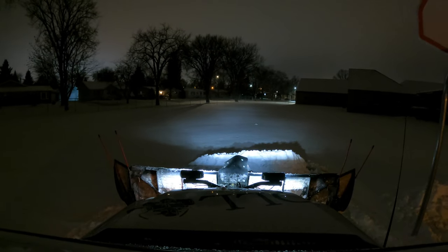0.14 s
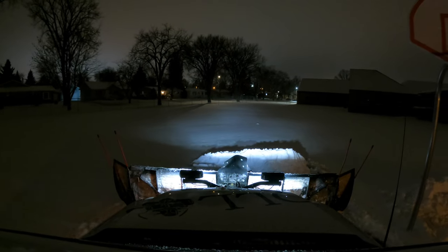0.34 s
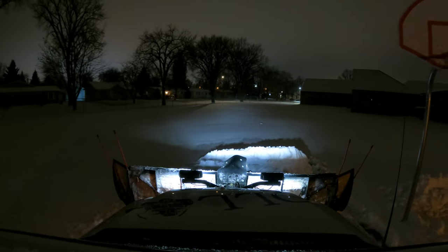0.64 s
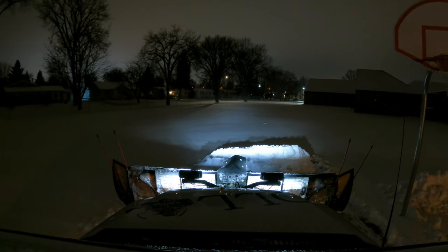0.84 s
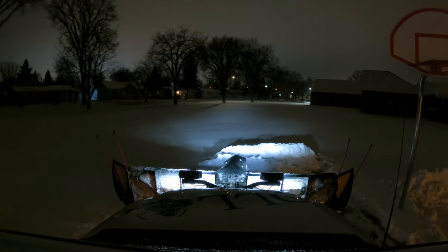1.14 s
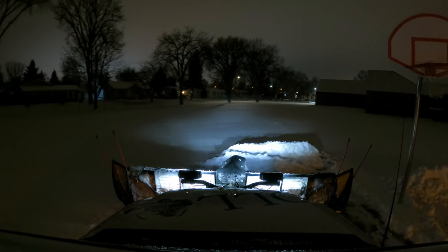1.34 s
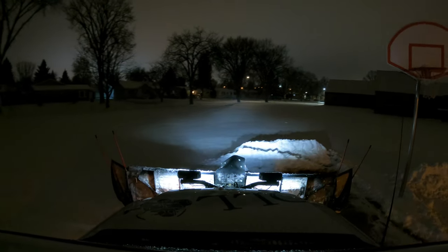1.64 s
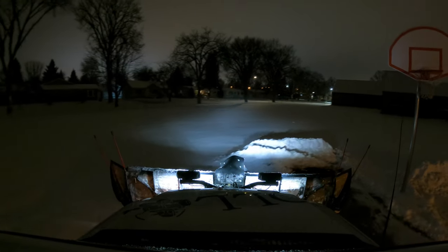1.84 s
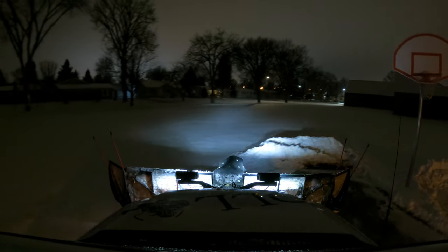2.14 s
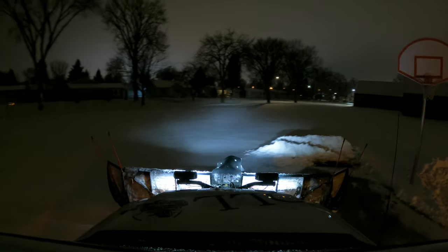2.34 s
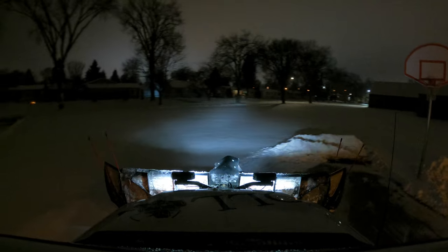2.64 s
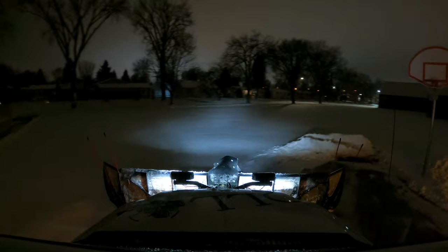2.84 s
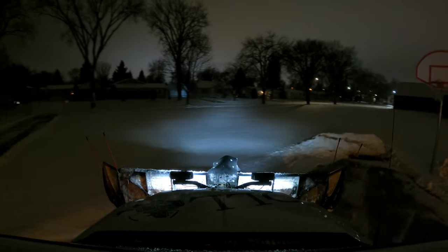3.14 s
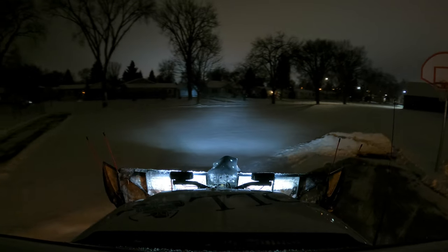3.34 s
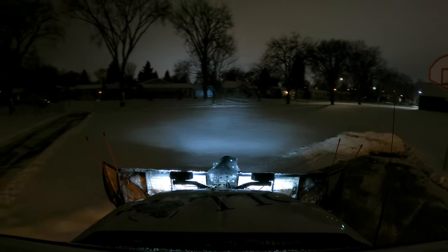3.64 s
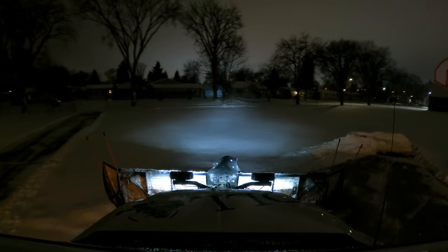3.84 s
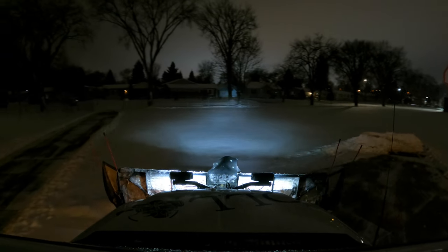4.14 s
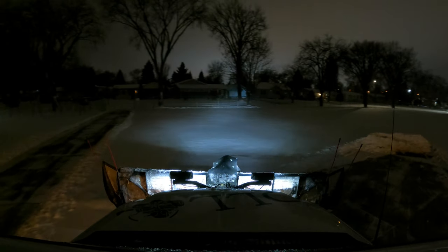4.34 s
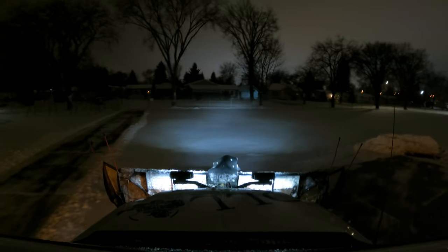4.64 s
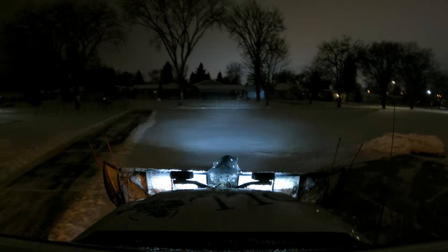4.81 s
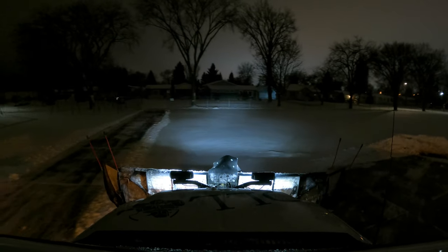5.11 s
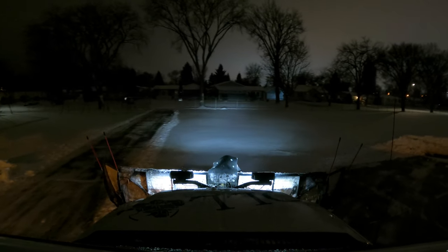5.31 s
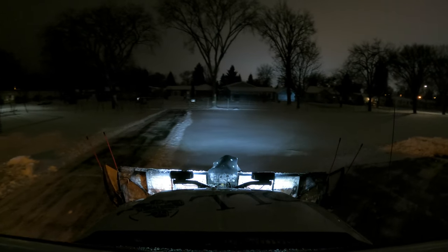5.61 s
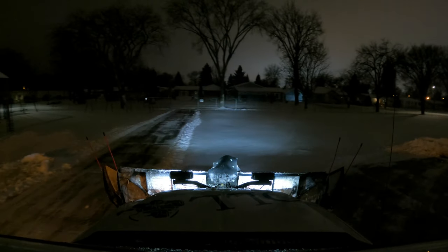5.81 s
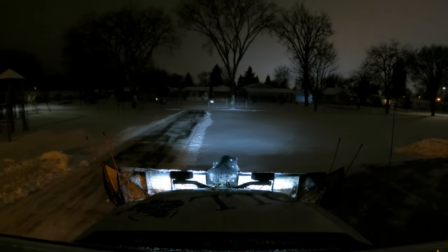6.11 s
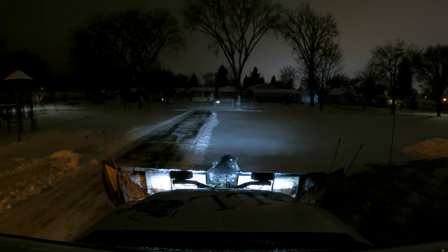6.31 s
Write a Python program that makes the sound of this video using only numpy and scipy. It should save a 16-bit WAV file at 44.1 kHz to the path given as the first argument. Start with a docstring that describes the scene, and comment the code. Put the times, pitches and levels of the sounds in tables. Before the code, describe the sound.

A diesel pickup plows snow on a paved lot, heard close to the hood, with a deep boom and rapid knocking throughout. The blade adds a continuous grainy scraping hiss with a thin, uneven metallic ring. The engine pulls from the start with a faint whine and soft fan noise, reaching its highest revs at about 2 seconds. A high turbo whistle rises with it, peaks just after 2 seconds and fades by 3.5. The engine booms around 2.3 seconds, then drops to lower revs, knocks harder near 3.6, and surges again from about 4.9 to 5.3 before settling. The blade catches on grit with short bright ticks at 4.2 and around 5 seconds. Soft bumps come at 1.8 and 4.6 seconds, and a stronger thud of the plow frame with a low chassis shudder at 6. The engine keeps running to the end, near 6.5 seconds.

```python
"""The boom and knock of a V8 diesel, heard close to the hood of a pickup pushing snow across a paved lot.
The engine pulls, eases off and pulls again. Its exhaust harmonics sweep through the resonances of the
body, and each combustion sets the block ringing with the colour of its cylinder. The turbo whistles up
and down once. Friction makes the plow blade hiss and ring over snow and pavement, and bumps make its
frame thud. Behind these lie a chassis shudder, the cooling fan and a faint whine."""
import sys
import numpy as np
from scipy import signal
from scipy.fft import rfft, irfft, next_fast_len
from scipy.io import wavfile

SR = 44100
rng = np.random.default_rng(int(sys.argv[2]) if len(sys.argv) > 2 else 0)


def inscribe(sig):
    """Save sig as 16-bit PCM at rate SR to the path in sys.argv[1].

    A 1-D sig is mono; a 2-D sig holds one channel per row.
    Samples are clipped to [-1, 1] before scaling.
    """
    pcm = np.round(np.clip(np.atleast_2d(sig).T, -1, 1) * 32767)
    wavfile.write(sys.argv[1], SR, pcm.astype(np.int16))


N = 285327
T = np.arange(N) / SR
FFT_SIZE = next_fast_len(N, real=True)
BIN_HZ = np.maximum(np.arange(FFT_SIZE // 2 + 1) * SR / FFT_SIZE, 1)
SIDES = np.array([[1], [-1]])  # opposite signs for left and right
CYLINDER_COUNT, CRUISE_FIRING_HZ, USUAL_LOAD_DB = 8, 51.2, -33


def from_db(db):
    """Amplitude ratio of a level in decibels."""
    return 10 ** (np.asarray(db) / 20)


def unit_rms(x):
    """Normalisation to unit mean power."""
    return x / np.sqrt(np.mean(x ** 2) + 1e-20)


def in_time(rows):
    """Linear interpolation of each column of a time table at every sample."""
    times, *columns = np.transpose(rows)
    return [np.interp(T, times, column) for column in columns]


def on_bins(rows):
    """Interpolation of a spectrum table on a logarithmic frequency axis."""
    hz, value = np.transpose(rows)
    return np.interp(np.log(BIN_HZ), np.log(hz), value)


def drift(bandwidth_hz):
    """Low-pass random modulation of unit RMS."""
    knots = rng.standard_normal(4000)
    return unit_rms(np.interp(T * bandwidth_hz * 2, np.arange(len(knots)), knots))


# Likeness of left and right: (frequency [Hz], correlation [0-1])
CORRELATION = [(150, .9988), (300, .985), (500, .96), (1000, .94), (2500, .92), (4000, .82), (6500, .84),
               (9000, .8), (11000, .96)]
def noise(spectrum):
    """Partially coherent stereo noise of unit RMS with the given spectral shape."""
    mid, side = rfft(rng.standard_normal((2, FFT_SIZE)))
    alike = np.clip(on_bins(CORRELATION), 0, 1)
    pair = np.sqrt(1 + alike) * mid + np.sqrt(1 - alike) * side * SIDES
    return unit_rms(irfft(pair * from_db(on_bins(spectrum)), FFT_SIZE)[:, :N])


def ring(clicks, hz, t60):
    """Damped oscillator: a unit impulse starts a decaying sine of unit amplitude."""
    radius, step = from_db(-60 / (t60 * SR)), 2 * np.pi * hz / SR
    return signal.lfilter([0, np.sin(step)], [1, -2 * radius * np.cos(step), radius ** 2], clicks + 1e-18)


def firings(crank, lead):
    """Phase crossings: the sample and cylinder of each firing, advanced by `lead` firing intervals."""
    count = np.floor(crank + lead).astype(int)
    at = np.flatnonzero(np.diff(count)) + 1
    return at, count[at] % CYLINDER_COUNT


# Engine speed: (time [s], firing rate [Hz])
FIRING_RATE = [(0.0, 56.46), (0.63, 55.36), (0.84, 59.11), (1.68, 63.69), (1.96, 70.77), (2.23, 67.23),
               (2.56, 52.57), (2.83, 46.78), (3.29, 44.87), (3.81, 51.79), (4.15, 40.77), (4.36, 44.38),
               (4.84, 40.36), (5.24, 59.29), (5.77, 42.33), (6.01, 40.36), (6.47, 47.72)]
# Engine load, expressed as the gain of the knock: (time [s], level [dB])
ENGINE_LOAD = [(0, -39), (1.25, -35.5), (1.85, -32.5), (2.3, -31), (2.6, -37.5), (3.15, -34), (3.58, -29),
               (4.0, -36.5), (4.25, -32), (4.62, -32), (4.84, -30), (4.95, -28), (5.13, -30), (5.4, -36),
               (5.75, -35.5), (5.95, -33), (6.47, -32.5)]
def engine():
    """Phase is the integral of frequency: firing rate, firings so far, and load above the usual."""
    firing_hz = in_time(FIRING_RATE)[0]
    return firing_hz, np.cumsum(firing_hz) / SR, in_time(ENGINE_LOAD)[0] - USUAL_LOAD_DB


# Exhaust harmonics: (multiple of the firing rate [1], relative level [dB])
EXHAUST_HARMONICS = [(1, 2.02), (2, 0.5), (3, -5)]
# Resonance curve of the truck body: (frequency [Hz], level [dB])
BODY_RESPONSE = [(41, -25), (45, -28.5), (50, -19.5), (56, -20), (61, -26.5), (66, -26.5), (72, -44),
                 (84, -32), (92, -30.5), (102, -36.5), (113, -30.5), (122, -21), (131, -37), (145, -34),
                 (158, -30), (170, -29.5), (210, -52)]
# Brief swells and sags: (time [s], half width [s], fundamental gain [dB], overtone gain [dB])
BOOM_SWELLS = [(1.94, 0.068, -9, -12), (2.334, 0.072, 1.5, 11), (2.474, 0.035, 0, 6), (2.723, 0.1, -3, -3),
               (3.27, 0.22, -7.5, 4), (4.077, 0.046, -14, -8), (4.37, 0.13, -5, -17), (5.4, 0.23, -1, -12),
               (5.728, 0.11, -5, -5)]
def exhaust_boom(firing_hz, strain_db, lag_s=0.0504, hardening=0.17, waver_db=0.75, waver_rad=0.018):
    """Forced resonance: each exhaust harmonic booms as it passes through a mode of the body."""
    fundamental_db, overtone_db = 0, hardening * strain_db
    for time_s, half_s, low_db, high_db in BOOM_SWELLS:
        swell = np.exp(-((T - time_s) / half_s) ** 2)
        fundamental_db += low_db * swell
        overtone_db += high_db * swell
    late_hz = np.interp(T - lag_s, T, firing_hz)  # resonances take a moment to build up and let go
    late_crank = np.cumsum(late_hz) / SR
    out = 0
    for multiple, db in EXHAUST_HARMONICS:
        level_db = db + np.interp(multiple * late_hz, *np.transpose(BODY_RESPONSE))
        level_db += fundamental_db if multiple == 1 else overtone_db
        phase = multiple * (2 * np.pi * late_crank + waver_rad * drift(0.8)) + (multiple - 1) * np.pi
        out += np.sqrt(2) * from_db(level_db + waver_db * drift(2.7)) * np.cos(phase)
    return out


# Spectral lines of the uneven exhaust pulses: (multiple of the firing rate [1], relative level [dB])
LOPE_LINES = [(1.375, -1.5), (1.5, -10), (1.625, 1), (2.125, -12.5), (2.25, -2), (2.375, 0.5), (2.5, -3),
              (2.875, -3.5), (3.5, -7.5), (4, 4), (4.25, -4), (5, -6.5)]
# Exhaust rumble as the body colours it: (frequency [Hz], relative level [dB])
RUMBLE_SPECTRUM = [(20, -16), (32, -31), (45, 12), (72, 4.5), (92, 11.5), (108, 7.5), (126, 10.5), (150, 1),
                   (190, 6), (228, 1.5), (252, -16.5), (290, -4), (400, -28), (2000, -68)]
def exhaust_rumble(firing_hz, crank, strain_db, cruise_db=-28, db_per_octave=9, load_follows=0.2,
                   lope_db=-2.5, puff_db=-1.5):
    """Modulation: unequal cylinders add lines between the harmonics, and noise puffs with each firing."""
    lope = 0
    for multiple, db in LOPE_LINES:
        line_db = db + np.interp(multiple * firing_hz, *np.transpose(RUMBLE_SPECTRUM))
        lope += from_db(line_db) * np.cos(2 * np.pi * (multiple * crank + rng.random()))
    puffs = unit_rms(1 + 0.34 * np.cos(2 * np.pi * crank)) * noise(RUMBLE_SPECTRUM)
    level_db = cruise_db + db_per_octave * np.log2(firing_hz / CRUISE_FIRING_HZ) + load_follows * strain_db
    return from_db(level_db) * (from_db(lope_db) * unit_rms(lope) + from_db(puff_db) * puffs)


# Combustion knock: (frequency [Hz], relative spectral density [dB])
KNOCK_SPECTRUM = [(200, -21.5), (350, -7.5), (600, -3.5), (880, -5), (1060, 0), (1600, -5), (2000, -8),
                  (2600, -5.5), (3600, -13), (5200, -12), (7500, -18.5), (9000, -27), (10500, -46),
                  (15000, -74)]
# Limits of the six bands in which the block rings: (frequency [Hz])
BAND_EDGES = [300, 950, 1250, 1650, 2550, 4000, 14000]
# Colour of each cylinder, in firing order: (relative level [dB] in each of the six bands)
CYLINDER_COLOURS = [(-0.8, 0.5, 0.0, 0.3, 1.0, 1.0), (0.0, 0.5, 1.0, -0.9, 0.5, 1.3),
                    (0.5, 1.0, -7.0, -2.0, -0.3, 0.2), (-1.1, -0.5, 0.5, 0.6, -0.9, 1.5),
                    (-0.5, -1.5, 2.0, -0.9, -2.0, -0.5), (-1.0, -2.0, -0.5, 0.7, 1.0, -0.3),
                    (-0.9, -1.5, -0.7, -1.1, -0.4, -1.8), (0.9, 0.5, -0.5, 1.8, 0.6, -1.3)]
# Part of a knock that is the same on every cycle: (frequency [Hz], share of power [0-1])
REPEATING_SHARE = [(500, .6), (1100, .5), (2200, .6), (3300, .85), (6000, .3)]
def knock(crank, strain_db, trim_db=-2.5, scatter_db=.75, jitter_s=.0001, rise_s=0.005, decay_s=0.012):
    """Impact on dense modes: each combustion rings the block as a dying noise, briefer in the highs."""
    at, cylinder = firings(crank, lead=.09)
    chance = rng.standard_normal((400, 8))[:len(at)]  # per firing: band levels, overall level, timing
    at = np.clip(at + (jitter_s * SR * chance[:, -1]).astype(int), 0, N - 1)
    size = 3072  # samples in one knock
    age = np.arange(size) / SR
    rest, out = noise(KNOCK_SPECTRUM), np.zeros((2, N + size))
    for k, (low, top) in enumerate(zip(BAND_EDGES, BAND_EDGES[1:])):
        band = signal.sosfiltfilt(signal.butter(8, top, fs=SR, output="sos"), rest)
        rest = rest - band
        centre_hz = np.sqrt(low * top)
        share = np.interp(centre_hz, *np.transpose(REPEATING_SHARE))
        attack = (1 - np.exp(-age / rise_s * (centre_hz / BAND_EDGES[3]) ** 0.26)) ** 2
        envelope = attack * np.exp(-age / decay_s * (centre_hz / BAND_EDGES[2]) ** 0.094)
        own = [unit_rms(band[:, c * size:(c + 1) * size] * envelope) for c in range(CYLINDER_COUNT)]
        strength = band.std() * unit_rms(from_db(np.array(CYLINDER_COLOURS)[:, k]))
        for onset, c, scatter in zip(at, cylinder, chance[:, k] + chance[:, -2]):
            start = rng.integers(N - size)
            fresh = unit_rms(band[:, start:start + size] * envelope)
            blow = np.sqrt(share) * own[c] + np.sqrt(1 - share) * fresh
            out[:, onset:onset + size] += strength[c] * from_db(scatter_db * scatter) * blow
    knocks = unit_rms(out[:, :N] / np.sqrt(np.gradient(crank)))  # power independent of the firing rate
    return from_db(USUAL_LOAD_DB + strain_db + trim_db) * knocks


# Strongest block modes, a list per cylinder: (frequency [Hz], relative level [dB], lag [firing intervals])
BLOCK_MODES = [
    [(700, 2.5, .25), (1035, 12.5, .06), (1220, 4.5, .06), (1440, 5, -.13), (1700, 1.5, .06),
     (1900, -1.5, .19)],
    [(540, 2.5, .19), (970, 7.5, .03), (1110, 9, .12), (1480, 6.5, .13), (1930, 0, .06)],
    [(595, 7, .19), (1035, 11, .12), (1160, 6.5, .03), (2540, -1.5, .13)],
    [(1160, 4.5, .31), (1365, 7.5, .13), (1990, 1, .06)],
    [(1485, 8.5, -.13), (2440, -1, .13)],
    [(1350, 3, .25), (2140, -2, .19), (2280, -1.5, -.19), (2500, 1, .25), (2920, 1, 0)],
    [(640, 2.5, .13), (1520, 1.5, -.13), (1760, -.5, .06)],
    [(500, 1.5, -.19), (780, 2, 0), (1070, 6, .69), (2120, 5, 0), (2340, -1, .19)],
]
def block_chug(crank, strain_db, trim_db=1.6, scatter_db=0.1, t60=.039, rise_t60=.018, load_follows=.4):
    """Modal excitation: each cylinder rings its own few modes, so a round of notes recurs every cycle."""
    out = 0
    for k, modes in enumerate(BLOCK_MODES):
        for hz, db, lag in modes:
            at, cylinder = firings(crank, -lag)
            at = at[cylinder == k]
            scatter = rng.standard_normal(100)[:len(at)]
            clicks = np.zeros(N)
            clicks[at] = from_db(db - scatter_db * scatter)
            out += ring(clicks, hz, t60) - ring(clicks, hz, rise_t60)
    return from_db(USUAL_LOAD_DB + load_follows * strain_db + trim_db) * out


# Tick of each injector, in firing order: (pitch [Hz], relative level [dB])
INJECTOR_PITCHES = [(2765, 0), (2770, .5), (2800, -1.5), (2885, -2), (2800, -5), (2680, .5), (3020, 1),
                    (2960, 0)]
# Modes of an injector: (multiple of its pitch [1], relative level [dB], T60 [s])
INJECTOR_MODES = [(0.999, -2.5, 0.019), (1.86, -10, 0.017), (2.42, -9, 0.011)]
def injectors(firing_hz, crank, strain_db, tick_db=-25, scatter_db=2.5, idle_hz=43, fade_db_per_hz=0.22,
              load_follows=0.49, cover_t60=0.03):
    """Impulse response of small steel parts: a tick per firing, strongest under load at low speed."""
    at, cylinder = firings(crank, lead=.02)
    level_db = tick_db + scatter_db * rng.standard_normal(400)[:len(at)]
    level_db += load_follows * strain_db[at] - fade_db_per_hz * (firing_hz[at] - idle_hz)
    out = 0
    for k, (hz, own_db) in enumerate(INJECTOR_PITCHES):
        clicks = np.zeros(N)
        clicks[at] = from_db(level_db + own_db) * (cylinder == k)
        for multiple, db, t60 in INJECTOR_MODES:
            ticks = ring(clicks, multiple * hz, t60)
            out += from_db(db) * ring(ticks, multiple * hz, cover_t60)  # builds up through the valve cover
    return 2 * (1 - from_db(-60 / (cover_t60 * SR))) * out  # cancels the cover's resonant gain


# The turbo spools up and coasts down: (time [s], frequency [Hz])
TURBO_PITCH = [(0, 3590), (.45, 3660), (.7, 3720), (.9, 3790), (1.3, 3985), (1.7, 4175), (1.85, 4280),
               (2.0, 4410), (2.15, 4510), (2.28, 4575), (2.45, 4520), (2.6, 4440), (2.8, 4240), (3.0, 4075),
               (3.22, 3945), (3.5, 3780), (4.0, 3570)]
# Strength of its whistle: (time [s], level [dB])
TURBO_LEVEL = [(0, -59), (.5, -53), (.85, -48.5), (1.05, -49), (1.3, -45.8), (1.65, -43.5), (1.82, -40),
               (2.0, -37.5), (2.2, -44), (2.45, -44), (2.7, -50), (3.0, -49), (3.22, -49), (3.4, -57),
               (4.0, -72)]
def turbo(crank, flutter_hz=11, shake_hz=26, waver_db=2.0, rough_db=-3.0, rough_drop_hz=118,
          rush_db=-2.0, rush_drop_hz=200, rush_width_hz=330, balance_db=6.0):
    """Rotor tone, frequency-modulated by exhaust pulses; boost adds a rough tone and air noise below it."""
    level_db = in_time(TURBO_LEVEL)[0]
    hz = in_time(TURBO_PITCH)[0] + flutter_hz * drift(30) + shake_hz * np.sin(2 * np.pi * crank)
    phase = 2 * np.pi * np.cumsum(hz) / SR
    whistle = from_db(waver_db * drift(16)) * np.sin(phase)
    rough = from_db(rough_db) * drift(30) * np.sin(phase - 2 * np.pi * rough_drop_hz * T)
    air = drift(rush_width_hz) + .5 * np.array([drift(rush_width_hz), drift(rush_width_hz)])
    rush = from_db(rush_db) * air * np.sin(phase - 2 * np.pi * rush_drop_hz * T)
    boost = from_db((level_db - level_db.max()) / 3)  # the rush grows faster than the whistle
    return from_db(level_db + balance_db * SIDES / 2) * (whistle + np.sqrt(boost) * rough + boost * rush)


# Hiss of the blade: (frequency [Hz], relative spectral density [dB])
SCRAPE_SPECTRUM = [(300, -1), (700, 2.5), (1300, 7), (2200, -3.5), (3600, -6), (5200, -7), (7500, -12.5),
                   (9000, -27), (10500, -34), (15000, -47.5)]
# Strength of the scrape: (time [s], level [dB])
SCRAPE_LEVEL = [(0, -38.5), (1.55, -40.5), (1.85, -35.5), (2.3, -37.5), (3.0, -38), (3.5, -38),
                (4.02, -41.5), (4.22, -36.5), (4.8, -37.5), (5.1, -35), (5.3, -37.5), (5.7, -39),
                (6.05, -35.5), (6.47, -40)]
# The blade catches on grit: (time [s], peak level [dB], decay time [s])
GRIT_CATCHES = [(4.19, -37, 0.0071), (4.92, -34, 0.0086), (4.96, -41, 0.04), (5.085, -43, 0.036),
                (6.279, -48, 0.0062)]
# Ring of the cutting edge at a catch: (frequency [Hz], relative spectral density [dB])
CATCH_SPECTRUM = [(1500, -14), (3500, -4), (4800, -10), (5520, 8), (6200, -14), (7400, -7), (9000, -13),
                  (10500, -30), (15000, -55)]
def blade_scrape(grain_db=1.5, judder_db=3.5, split_hz=6000):
    """Friction noise of steel on snow and grit: a grainy hiss with flickering treble and bright catches."""
    hiss = noise(SCRAPE_SPECTRUM)
    low = signal.sosfiltfilt(signal.butter(4, split_hz, fs=SR, output="sos"), hiss)
    hiss = low + (hiss - low) * from_db(judder_db * drift(21))
    hiss *= from_db(in_time(SCRAPE_LEVEL)[0] + grain_db * drift(280))
    catches = 0
    for time_s, db, decay_s in GRIT_CATCHES:
        age = np.maximum(T - time_s, 0) / decay_s
        catches += from_db(db) * np.sqrt(2 * np.e * age) * np.exp(-age)
    return hiss + catches * noise(CATCH_SPECTRUM)


# Band of the cutting edge, shifting with the pressure on it: (time [s], frequency [Hz], level [dB])
EDGE_BAND = [(0, 5430, -63), (1.9, 5400, -50), (2.35, 5280, -55), (2.7, 5010, -51), (3.2, 5230, -50),
             (3.5, 5200, -52), (3.9, 5130, -57), (4.4, 5270, -51), (4.8, 5170, -48), (4.93, 5640, -56),
             (5.15, 5520, -50), (5.4, 5220, -52), (6.0, 5170, -62), (6.3, 5230, -64)]
def edge_ring(crank, width_hz=300, spurt_db=5.0, shake_depth=0.36):
    """Friction-driven resonance: the dragging steel edge rings in uneven spurts, shaken by the engine."""
    hz, level_db = in_time(EDGE_BAND)
    phase = 2 * np.pi * np.cumsum(hz) / SR
    band = drift(width_hz) * np.sin(phase) + drift(width_hz) * np.cos(phase)
    spread = 0.2 * drift(width_hz) * np.sin(phase) * SIDES
    shaking = 1 + shake_depth * np.sin(2 * np.pi * crank)
    return from_db(level_db) * unit_rms((band + spread) * shaking * from_db(spurt_db * drift(19)))


# Jolts from uneven ground: (time [s], frame level [dB], body level [dB])
JOLTS = [(1.838, -42.5, -42), (4.597, -45, -41), (6.039, -35, -29)]
# Modes of the plow frame: (frequency [Hz], relative level [dB], T60 [s])
FRAME_MODES = [(140, 16, 0.24), (202, -10, 0.079), (310, 5, 0.14), (335, 7, 0.13), (467, 2, 0.095)]
def plow_bumps(thump_hz=52.3, thump_t60=0.42):
    """Free vibration after impact: the plow frame thuds and the body thumps on its springs and mounts."""
    frame_hits, body_hits = np.zeros((2, N))
    for time_s, frame_db, body_db in JOLTS:
        at = round(time_s * SR)
        frame_hits[at], body_hits[at] = from_db(frame_db), from_db(body_db)
    thuds = sum(from_db(db) * ring(frame_hits, hz, t60) for hz, db, t60 in FRAME_MODES)
    return thuds + ring(body_hits, thump_hz, thump_t60)


# Strength of the chassis shudder: (time [s], level [dB])
SHUDDER_LEVEL = [(0, -42), (1.2, -42), (2.1, -34), (3.1, -33), (4.1, -36), (4.6, -30), (4.85, -34),
                 (5.7, -42), (6.1, -28), (6.47, -34)]
# Its deep band: (frequency [Hz], relative spectral density [dB])
SHUDDER_SPECTRUM = [(15, -4), (29, 1.5), (38, 4), (50, 14), (60, 9), (75, -16.5), (150, -48.5), (600, -110)]
def chassis_shudder():
    """Random forced vibration: the dragging blade shakes the chassis, which beats against the boom."""
    return from_db(in_time(SHUDDER_LEVEL)[0]) * noise(SHUDDER_SPECTRUM)


# Air through the radiator: (frequency [Hz], relative spectral density [dB])
FAN_SPECTRUM = [(150, -18), (290, 6), (420, 1), (780, -0.5), (1500, -3.5), (3000, -12), (6000, -18.5),
                (12000, -67)]
def cooling_fan(firing_hz, cruise_db=-40, exponent=2.35):
    """Flow noise: its amplitude grows as a power of engine speed."""
    return from_db(cruise_db) * (firing_hz / CRUISE_FIRING_HZ) ** exponent * noise(FAN_SPECTRUM)


# A faint whine under the hood: (time [s], level [dB])
WHINE_LEVEL = [(0, -49), (1.3, -45), (1.8, -61), (2.6, -70)]
def whine(hz=786, wander_hz=5):
    """A sine with slight random frequency modulation, heard while the engine first pulls."""
    phase = 2 * np.pi * np.cumsum(hz + wander_hz * drift(6.8)) / SR
    return from_db(in_time(WHINE_LEVEL)[0]) * np.sin(phase)


# Peaks and dips of the hood and engine bay: (frequency [Hz], bandwidth [Hz], gain [dB])
HOOD_RESONANCES = [(555, 9, 1.5), (687, 25, 8.5), (725, 123, -7.5), (769, 44, 8), (877, 70, -4.5),
                   (1007, 27, 0.5), (1180, 37, 1.5), (1382, 145, -4.5), (1338, 12, 8.5), (1501, 37, 4),
                   (1756, 88, -3.5), (2776, 50, 3.5), (2963, 400, 4), (4860, 230, -3.5), (5304, 280, 2),
                   (6080, 1870, -7.5), (6820, 280, 3)]
def hood(sound):
    """Resonance and antiresonance: panels and cavities raise some pitches and swallow others."""
    sections = []
    for hz, width_hz, db in HOOD_RESONANCES:
        gain, width, tuning = from_db(db / 2), np.pi * width_hz / SR, -2 * np.cos(2 * np.pi * hz / SR)
        numerator = [1 + width * gain, tuning, 1 - width * gain]
        denominator = [1 + width / gain, tuning, 1 - width / gain]
        sections.append(np.array(numerator + denominator) / denominator[0])
    return signal.sosfilt(np.array(sections), sound)


def scene():
    """Superposition: engine, turbo and plow add up, with one crank phase timing all that pulses."""
    firing_hz, crank, strain_db = engine()
    clatter = knock(crank, strain_db) + injectors(firing_hz, crank, strain_db)
    chug = block_chug(crank, strain_db)
    hiss = cooling_fan(firing_hz) + blade_scrape()
    exhaust = exhaust_boom(firing_hz, strain_db) + exhaust_rumble(firing_hz, crank, strain_db)
    direct = chug + edge_ring(crank) + turbo(crank) + whine() + plow_bumps() + chassis_shudder()
    return hood(exhaust + clatter + hiss) + direct


# Level difference between the microphone ports: (frequency [Hz], left minus right [dB])
PORT_LEVEL_DIFFERENCE = [(250, 0), (430, -.3), (560, -2), (850, -3), (1100, -2), (1400, -3), (2200, -1.2),
                         (3500, -1.6), (4000, 0), (5000, -3.7), (5800, -3), (6600, 0)]
# Phase difference between them: (frequency [Hz], lead of the left [rad])
PORT_PHASE_DIFFERENCE = [(1000, 0), (1800, -.25), (3100, -.95), (4500, -.35), (6000, 0)]
def record(dry, cutoff_hz=15500):
    """Interchannel level and phase differences colour two close microphone ports; the top is cut."""
    left = from_db(on_bins(PORT_LEVEL_DIFFERENCE) / 2) * np.exp(1j * on_bins(PORT_PHASE_DIFFERENCE) / 2)
    heard = irfft(rfft(dry, FFT_SIZE) * np.array([left, 1 / left]), FFT_SIZE)[:, :N]
    return signal.sosfilt(signal.cheby2(12, 70, cutoff_hz, fs=SR, output="sos"), heard)


dry = scene()
out = record(dry)
inscribe(out)
```